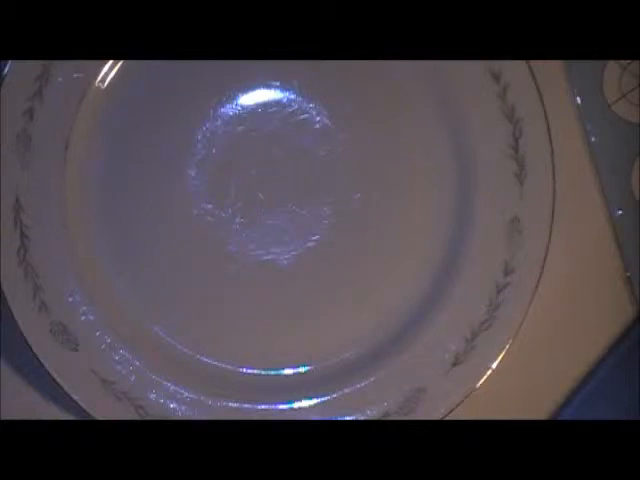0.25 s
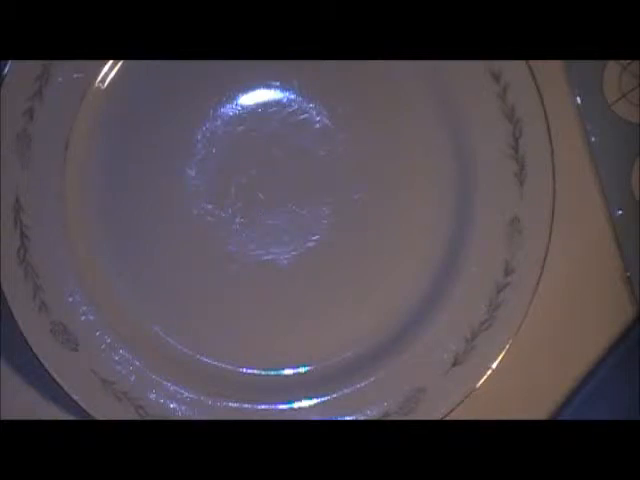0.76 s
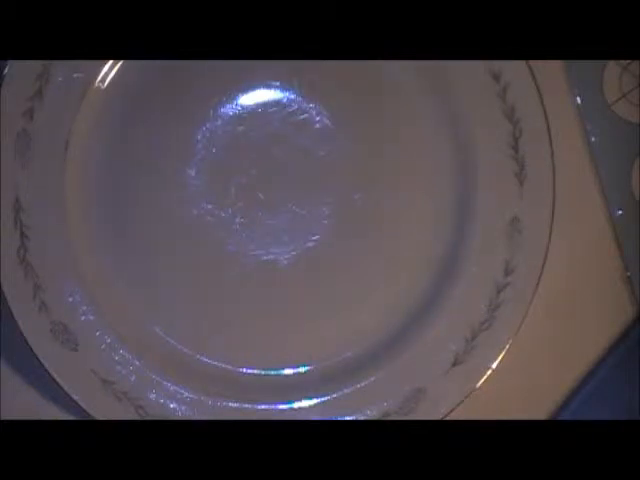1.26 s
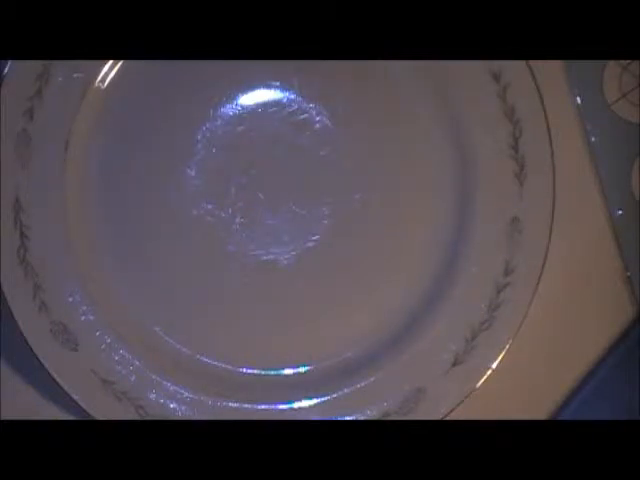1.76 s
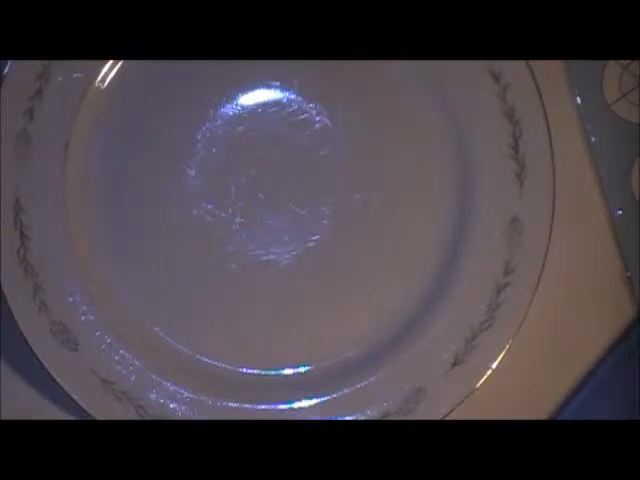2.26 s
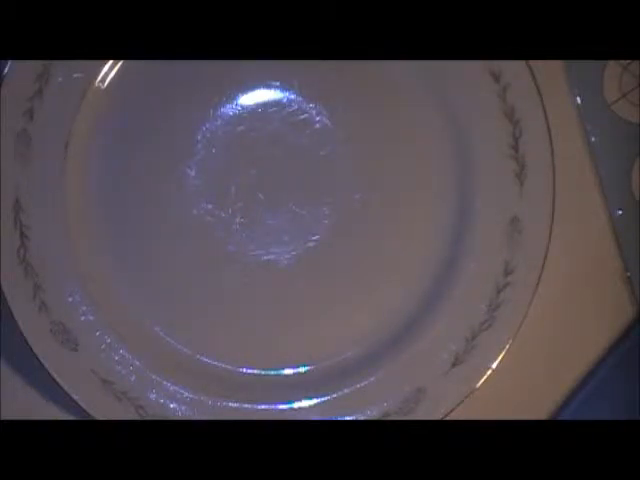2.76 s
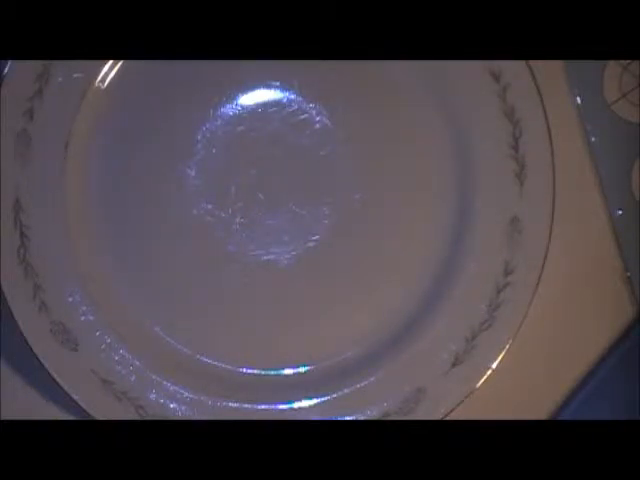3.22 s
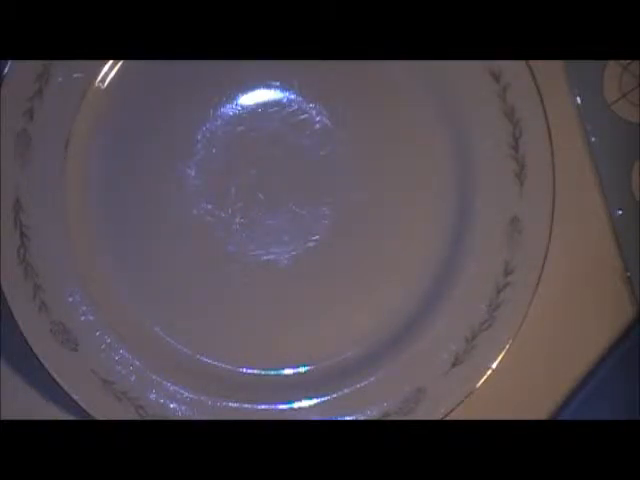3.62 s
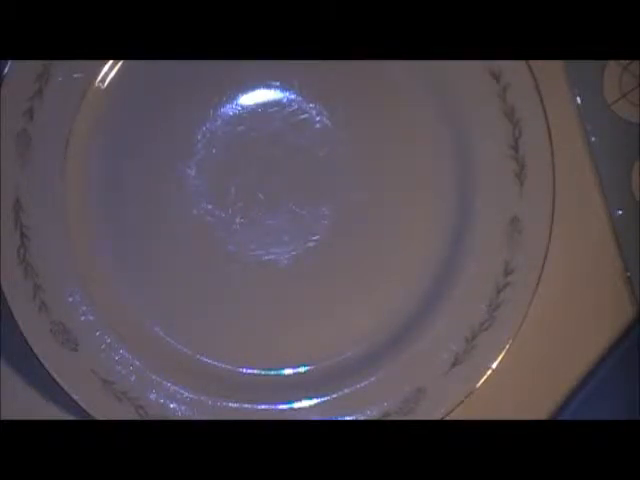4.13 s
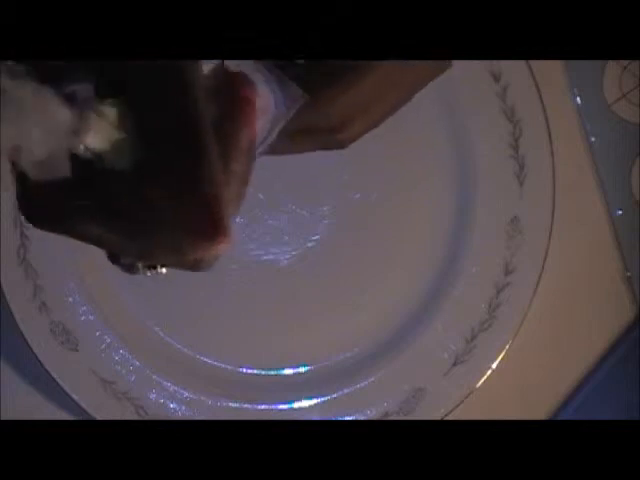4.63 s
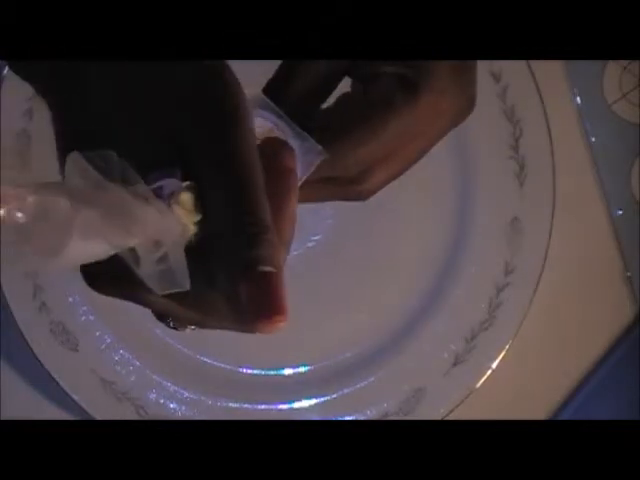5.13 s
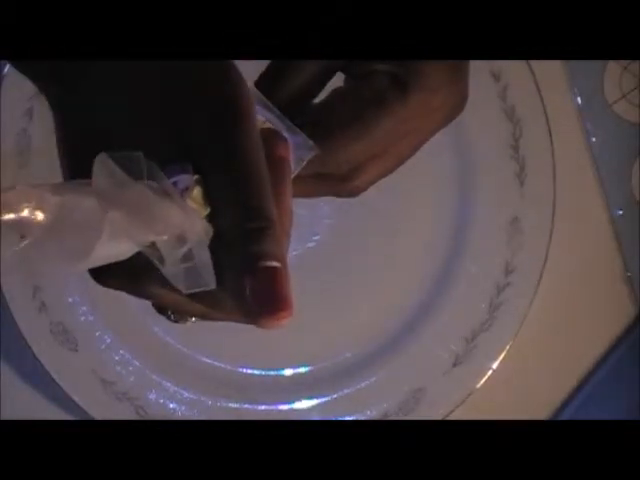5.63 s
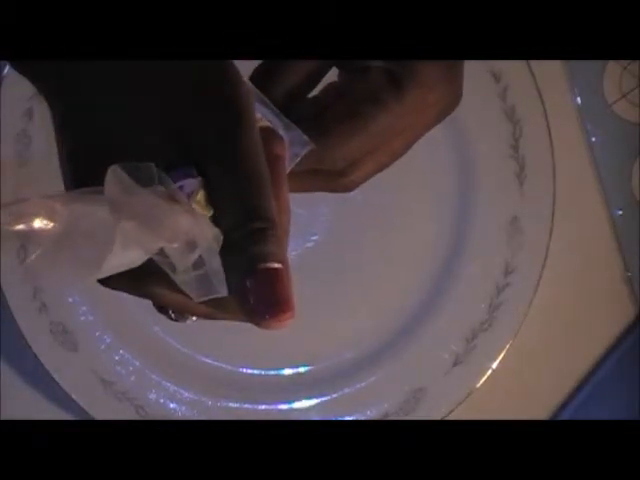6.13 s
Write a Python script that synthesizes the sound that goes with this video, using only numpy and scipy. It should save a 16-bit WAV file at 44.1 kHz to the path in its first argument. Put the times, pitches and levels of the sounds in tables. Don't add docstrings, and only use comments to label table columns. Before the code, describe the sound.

A thin plastic bag is handled close to a stereo microphone in a kitchen. After a quiet start, soft rubbing grows into a burst of sharp crackles with one very loud snap, another hard pop follows, then scattered clicks and a soft table knock. Only faint refrigerator hum, hiss and a few tiny ticks remain.

```python
import sys
import numpy as np
from scipy import signal
from scipy.fft import rfft, irfft, next_fast_len
from scipy.io import wavfile
from scipy.ndimage import uniform_filter1d

SR = 44100
rng = np.random.default_rng(int(sys.argv[2]) if len(sys.argv) > 2 else 0)


def unload_audio(sound):
    columns = np.transpose(np.atleast_2d(sound))
    steps = np.round(np.clip(columns, -1, 1) * 32767)
    wavfile.write(sys.argv[1], SR, steps.astype(np.int16))


def invert_db(x):
    u = np.asarray(x, float) / 20
    return 10 ** u


N = 281358

# frequency in Hz, level in dB per Hz.
AIR_COLOUR = [(20, -33.5), (70, -30.5), (119, -9), (450, -5), (700, -4.5), (1070, -7), (1800, -15.5),
              (3960, -90.5)]
# frequency in Hz, level in dB per Hz.
HISS_COLOUR = [(1060, -15), (1800, 0.5), (3230, -3.5), (4000, -6), (7720, -9), (13000, -15.5), (14800, -26),
               (16500, -44.5)]
AIR_DB, HISS_DB = -61.5, -66.5
# frequency in Hz, level in dB rms.
HUM_LINES = [(120, -78), (247, -84), (360, -83), (960, -76), (597.5, -74), (721.4, -71), (839.8, -71),
             (1082, -72), (1443, -82)]
# frequency in Hz, level in dB rms.
BUZZ_LINES = [(2164, -84), (3601, -83), (3720, -88), (3962, -88), (5163, -88), (5281, -88), (5399, -87),
              (5884, -85), (6121, -80), (6481, -86), (6724, -89), (7321, -88), (9243, -86), (11526, -94)]
MOTOR_HZ, SCREEN_HZ, SCREEN_DB = 120.05, 15734, -85
HANDS_S = 4.6
HAND_SHADOW = {5: (0, 4), 6: (1, -13), 8: (-8, -4), 9: (0, 2), 30: (3, -2)}
# frequency in Hz, width in Hz, level in dB, flutter in dB.
CUPPED_AIR = (941, 85.5, -71.5, 4)
# frequency in Hz, left minus right in dB.
BACKGROUND_LEAN = [(60, -3), (200, -2), (380, -0.5), (700, -3), (2380, -0.5), (4400, -1.3), (8120, 0),
                   (15000, -1.5)]

# delay in ms, level in dB.
EARLY_ECHOES = [(.4, -27), (5.3, -23), (10.6, -25)]
# frequency in Hz, time to fall 60 dB in seconds, level in dB.
ROOM_TAIL = [(820, 0.22, -19), (2500, 0.26, -22.5), (6000, 0.31, -23), (11400, 0.35, -37.5)]
# frequency in Hz, width in Hz, time to fall 60 dB in seconds, level in dB.
PLATE_RING = (2099, 450.5, 0.59, -31.5)

# start in seconds, peak in dB, frequency in Hz, 60 dB fall in seconds.
TABLE_KNOCKS = [
    (3.927, -44.5, 355, 0.041),
    (3.95, -55, 160, 0.061),
]
# middle in seconds, length in seconds, level in dB.
SLEEVE_DRAGS = [
    (0.895, .16, -57),
    (1.3, 0.93, -65),
    (1.62, 0.82, -60.5),
    (2.2, 1.5, -63.5),
    (3.4, 0.76, -69),
    (4.4, .5, -76),
]
# middle in seconds, length in seconds, level in dB, bright minus dull in dB.
FINGER_STROKES = [(0.887, 0.073, -66.5, -10), (0.993, .13, -54, 4.5), (1.291, 0.21, -59, -3.5),
                  (1.383, 0.17, -58.5, -4), (1.567, 0.27, -56.5, 2), (1.932, 0.31, -55.5, 2.5),
                  (2.24, 0.45, -63, 3.5), (2.482, 0.25, -62.5, 17), (2.73, 0.11, -61.5, 14),
                  (2.781, .11, -48.5, 5.5), (3.057, 0.57, -63.5, 3.5), (3.274, .3, -69, 11.5),
                  (3.49, 0.26, -63, 9.5), (3.714, 0.44, -67, -2), (3.984, 0.24, -71, 15),
                  (4.3, 0.28, -72.5, 2), (4.459, 0.41, -62, -2.5), (4.7, .25, -70, -6.5)]
STROKE_FADE_DB = 12
MIDDLE_DB = -3
# start in seconds, length in seconds, level in dB, first and second ring in Hz.
FOLD_SCUFFS = [(1.477, 0.036, -49, 1340, 9300), (1.617, .01, -48.5, 1400, 4230),
               (1.655, .018, -51.5, 746, 2500), (1.788, 0.0078, -32, 2170, 6000),
               (1.798, 0.031, -45, 2150, 752), (2.747, .051, -43, 3380, 7900),
               (3.145, 0.039, -58.5, 2170, 8100), (3.597, .006, -40, 2240, 4400),
               (3.997, 0.025, -54.5, 3900, 5200), (4.03, 0.033, -51, 6550, 9000),
               (4.052, 0.0112, -50, 4000, 2970), (4.103, .013, -55.5, 6000, 7900),
               (4.652, 0.0079, -50, 2900, 1410)]
SECOND_DB_PER_OCTAVE, SECOND_EVEN_HZ = 4, 3500

# time in seconds, panel ring in Hz, treble in dB, ring in dB against treble.
CREASE_CRACKS = [(1.569, 5460, -33, -2), (1.6315, 2410, -34.5, 7), (1.639, 3100, -36, -15),
                 (1.6513, 7640, -19.5, -19), (1.671, 3380, -37.5, -8), (1.7188, 2840, -26.5, -2),
                 (1.7886, 5494, -17.5, -17), (1.7925, 2176, -15, -5), (1.8612, 2815, -1, -10.5),
                 (1.8918, 6240, -17, 1), (1.9973, 4090, -23, -7), (2.0266, 1952, -36.5, -7),
                 (2.3955, 2250, -32.5, -5), (2.4352, 6500, -22.5, -2), (2.4557, 3680, -18.5, -3.5),
                 (2.748, 8100, -23.5, -9), (2.7516, 8070, -24, -5), (2.766, 8350, -29, -1.5),
                 (2.7815, 8940, -20.5, -19), (2.7841, 7820, -27, -8), (2.796, 7760, -20.5, -7),
                 (2.89, 3620, -25.5, -1.5), (3.5978, 5860, -17.5, -15), (3.9235, 5200, -37, -0.5),
                 (4.6517, 5400, -37, 3)]
CRACK_MS, CRACK_BODY_DB = 0.14, -30
# time in seconds, ring in Hz, ring in dB, pop length in ms.
PANEL_POPS = [(1.675, 7000, -32, .16), (1.7229, 2903, -29, 0.2), (1.789, 5600, -18, .52),
              (2.001, 7000, -27, 0.23), (2.368, 7960, -33, .3), (2.4574, 7130, -2.5, 0.46),
              (2.7767, 3320, -27, .09), (2.8772, 6030, -32, 0.085), (3.5983, 3060, -22.5, 0.87),
              (3.9274, 7770, -33.5, 0.1), (4.0026, 4090, -38, .17), (4.045, 4160, -44, .31),
              (4.0563, 4000, -26.5, 0.4), (4.113, 7900, -34, 0.52), (4.653, 2930, -31.5, 0.62)]
POP_BODY_DB, POP_TREBLE_DB = -25.5, -21
# time in seconds, panel ring in Hz, body in dB.
FOLD_FLOPS = [(1.617, 1270, -41), (1.6644, 1230, -37.5), (1.709, 1284, -39.5), (1.8257, 1920, -40),
              (1.8633, 1900, -28), (1.9035, 3000, -40), (2.0976, 2160, -41.5), (2.1866, 2920, -44),
              (2.4569, 2900, -31), (2.9525, 1230, -43), (3.1584, 2600, -40.5), (3.214, 1830, -46.5),
              (4.6525, 1540, -41.5), (4.9598, 3500, -49), (5.2343, 3000, -52)]
FLOP_MS, FLOP_RING_DB, FLOP_TREBLE_DB = 0.15, -3.5, -15
# frequency in Hz, level in dB.
FILM_COLOUR = [(150, -14.5), (300, -1.5), (1500, 3.5), (10500, -1.5), (12500, -7), (16000, -28.5)]


def colour(x, points):
    size = next_fast_len(x.shape[-1])
    hz, db = np.transpose(points)
    bins_hz = np.arange(size // 2 + 1) * SR / size
    gain = invert_db(np.interp(np.log(bins_hz + 1), np.log(hz), db))
    return irfft(rfft(x, size) * gain, size)[..., :x.shape[-1]]


def band(x, hz, width_hz):
    b, a = signal.iirpeak(min(hz, 0.45 * SR), hz / width_hz, fs=SR)
    return signal.lfilter(b, a, x)


def unit(x):
    return x / np.sqrt(np.mean(x ** 2))


def peak(x, db):
    return x * invert_db(db) / np.abs(x).max()


def walk(rate):
    k = int(SR / rate)
    steps = np.repeat(rng.standard_normal(N // k + 1), k)
    return 0.79 * uniform_filter1d(uniform_filter1d(steps, k), k)[:N]


def add(out, s, sound):
    i = int(s * SR)
    out[i:i + len(sound)] += sound[:len(out) - i]


def air():
    air_noise, hiss_noise = rng.standard_normal((2, 2, N))
    shared_bass = colour(rng.standard_normal(N), [(60, 5.0), (200, -20.0), (400, -26)])
    flicker = invert_db(0.6 * walk(6))
    room_air = unit(colour(air_noise + shared_bass, AIR_COLOUR)) * invert_db(AIR_DB) * flicker
    return room_air + unit(colour(hiss_noise, HISS_COLOUR)) * invert_db(HISS_DB)


def fridge():
    t = np.arange(N) / SR
    out = invert_db(SCREEN_DB) * np.sin(2 * np.pi * SCREEN_HZ * t) * np.ones((2, 1))
    turn = 2 * np.pi * MOTOR_HZ * t + 0.004 * walk(25)
    for hz, db in HUM_LINES + BUZZ_LINES:
        order = round(hz / MOTOR_HZ)
        phase = 2 * np.pi * rng.random() + 0.45 * rng.standard_normal((2, 1))
        shadow_db = np.interp(t, [HANDS_S - 0.2, HANDS_S + 0.2], HAND_SHADOW.get(order, (0, 0)))
        level = invert_db(db + shadow_db + 0.3 + 1.2 * walk(5))
        out += np.sqrt(2) * level * np.sin(order * turn + phase)
    return out


def hollow():
    hz, width_hz, db, flutter_db = CUPPED_AIR
    cupped = np.clip((np.arange(N) / SR - HANDS_S) / 0.3, 0, 1)
    hum = band(band(rng.standard_normal((2, N)), hz, width_hz), hz, width_hz)
    return unit(hum) * invert_db(db + flutter_db * walk(9)) * cupped


def kitchen(near, room):
    t = np.arange(int(0.6 * SR)) / SR
    noise = rng.standard_normal(len(t)) + 0.73 * rng.standard_normal((2, len(t)))
    tail = 0
    for k, (hz, t60, db) in enumerate(ROOM_TAIL):
        tail = tail + (-1) ** k * invert_db(db - 60 * t / t60) * band(noise, hz, 1.05 * hz)
    hz, width_hz, t60, db = PLATE_RING
    tail = tail - invert_db(db - 60 * t / t60) * band(noise, hz, width_hz)
    tail = tail * np.clip(t / 0.002, 0, 1) * invert_db(-10.0)
    early = np.ones((2, 1)) * (t == 0)
    for ms, db in EARLY_ECHOES:
        late = t - ms / 1000
        early = early + invert_db(db) * noise * (late > 0) * np.exp(-np.abs(late) / 0.0003)
    burst = rng.standard_normal(len(t)) * (t > 0.0001) * np.exp(-t / 0.0004)
    early = early + np.array([[1], [-1]]) * invert_db(-11) * band(burst, 10500.0, 5000.0)
    direct = signal.fftconvolve(near[None], early, axes=1)
    return (direct + signal.fftconvolve(room[None], tail, axes=1))[:, :N]


def knocks():
    out, t = np.zeros(N), np.arange(6000) / SR
    for s, db, hz, t60 in TABLE_KNOCKS:
        attack = 1 - np.exp(-t / 0.0016)
        add(out, s, invert_db(db - 60 * t / t60) * np.sin(2 * np.pi * hz * t) * attack)
    return out


def grains(size, share, spread_db):
    slip = rng.random(size) < share
    return unit(slip * rng.standard_normal(size) * invert_db(spread_db * rng.exponential(size=size)))


def swells(s, length, db):
    t = np.linspace(0, N / SR, num=1600)
    off = 2 * (t[:, None] - s) / length
    power = np.sum(invert_db(db - STROKE_FADE_DB * off ** 2) ** 2, axis=1)
    return np.interp(np.arange(N) / SR, t, np.sqrt(power))


def rub():
    s, length, db, tilt_db = np.transpose(FINGER_STROKES)
    gains = [swells(*np.transpose(SLEEVE_DRAGS))]
    for patch_db in (-tilt_db / 2, MIDDLE_DB, tilt_db / 2):
        gains.append(swells(s, length, db + patch_db))
    patches = [(320.0, 355.0), (1200.0, 1940.0), (3500.0, 4000.0), (8500.0, 7200.0)]
    out = 0
    for (hz, width_hz), gain in zip(patches, gains):
        patch = band(band(grains(N, 0.3, 2.0), hz, width_hz), hz, width_hz)
        out = out + unit(patch) * gain * invert_db(-6.0)
    return out * invert_db(2.1 * walk(30.12))


def scuffs():
    out = np.zeros(N)
    for s, length, db, low_hz, high_hz in FOLD_SCUFFS:
        high_db = SECOND_DB_PER_OCTAVE * np.log2(high_hz / SECOND_EVEN_HZ)
        slips = grains(int(length * SR), 0.4, 1.5)
        low = unit(band(slips, low_hz, 0.19 * low_hz))
        high = unit(band(slips, high_hz, 0.29 * high_hz))
        ring = unit(low + invert_db(high_db) * high) + invert_db(-10) * slips
        add(out, s, invert_db(db) * unit(ring) * signal.windows.tukey(len(slips), 0.3))
    return out


def creases():
    cracks = [(s, hz, db + ring_db, db + CRACK_BODY_DB, db, CRACK_MS) for s, hz, db, ring_db in CREASE_CRACKS]
    pops = [(s, hz, db, db + POP_BODY_DB, db + POP_TREBLE_DB, ms) for s, hz, db, ms in PANEL_POPS]
    flops = [(s, hz, db + FLOP_RING_DB, db, db + FLOP_TREBLE_DB, FLOP_MS) for s, hz, db in FOLD_FLOPS]
    return sorted(cracks + pops + flops)


def snaps():
    near, room, t = np.zeros(N), np.zeros(N), np.arange(1024) / SR
    for s, hz, ring_db, body_db, treble_db, ms in creases():
        span = np.clip(ms, 0.02, 4) / 1000
        crack = rng.standard_normal(len(t)) * np.sqrt(t / span) * np.exp(-t / span)
        crack[0] = -2.5
        regions = [(1400, 1500, body_db, 1), (3600, 2800, (body_db + treble_db) / 2 - 3, -1),
                   (8000, 7000, treble_db, 1), (hz, 0.2 * hz, ring_db - 3, 1)]
        parts = [peak(band(crack, f, w), db) * sign for f, w, db, sign in regions]
        add(near, s - span / 2, sum(parts))
        power = 0
        for (f, w, _, _), part in zip(regions, parts):
            broad = unit(band(1.0 * (t == 0), f, max(w, 0.45 * f))) * np.std(part)
            power = power + np.abs(rfft(broad)) ** 2
        pulse = irfft(np.sqrt(power))
        add(room, s, np.roll(pulse, 44)[:512])
    return np.array([near, room])


def scene():
    film = colour(snaps() + scuffs() + rub(), FILM_COLOUR)
    near, room = film + knocks()
    bag = kitchen(near, room)
    back = air() + fridge() + hollow()
    sides = []
    for k, half in enumerate((0.5, -0.5)):
        lean = colour(back[k], [(hz, db * half) for hz, db in BACKGROUND_LEAN])
        sides.append(colour(bag[k], [(5000, 0.066), (9000, 0.81 * half)]) + lean)
    return np.array(sides)


def band_limit(x):
    return signal.sosfilt(signal.butter(12, 16790, fs=SR, output="sos"), x)


def record(dry):
    bent = dry - 0.084 * dry ** 2
    return band_limit(bent)


dry = scene()
out = record(dry)
unload_audio(out)
```